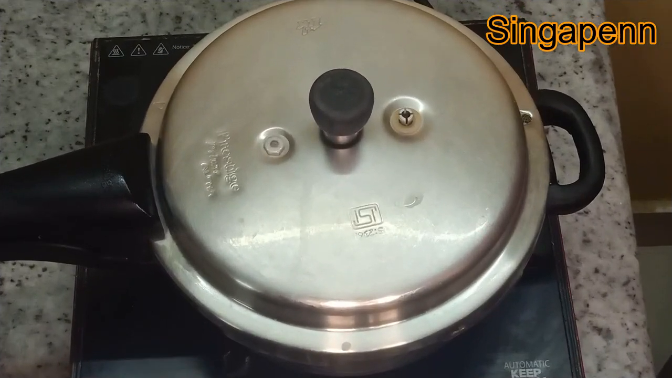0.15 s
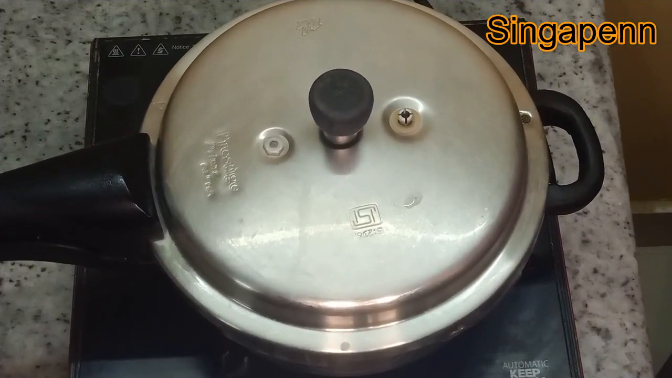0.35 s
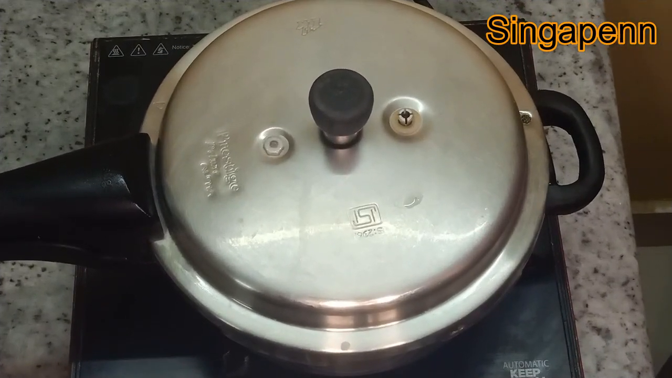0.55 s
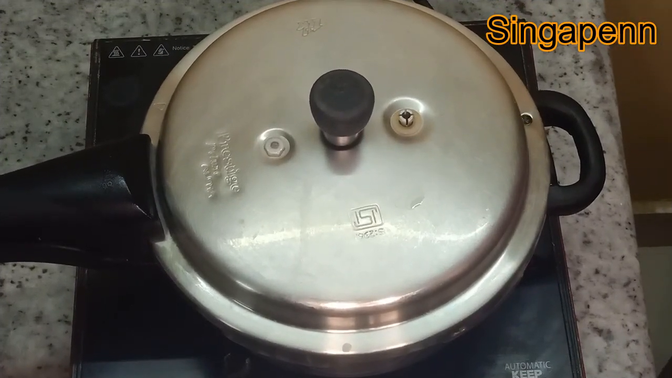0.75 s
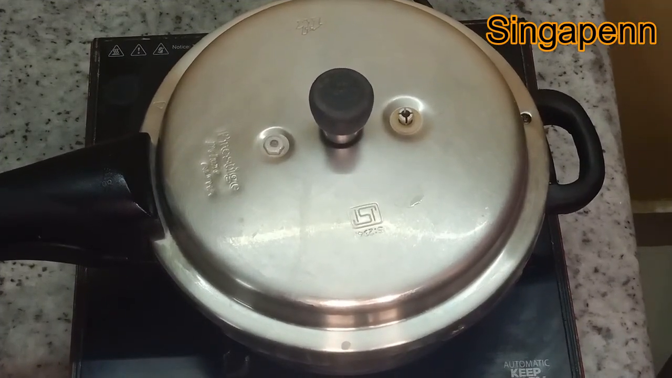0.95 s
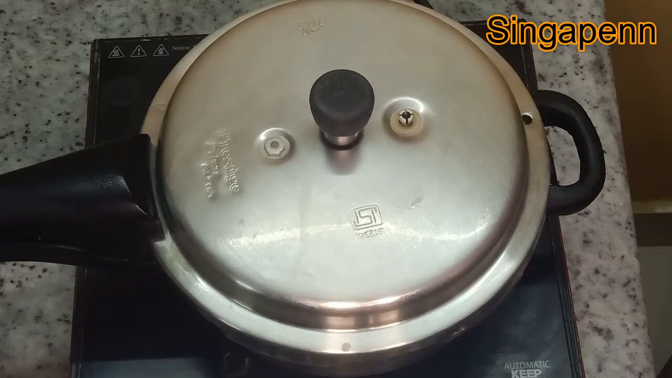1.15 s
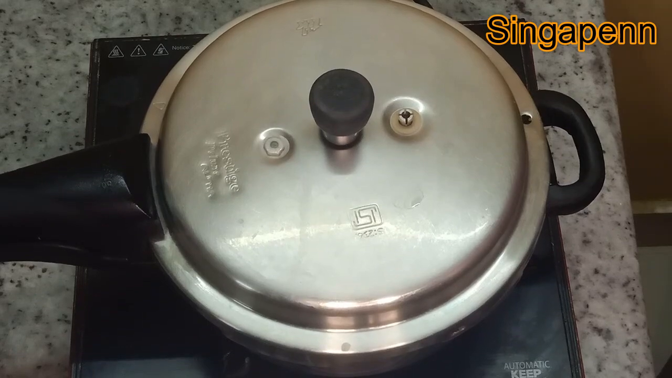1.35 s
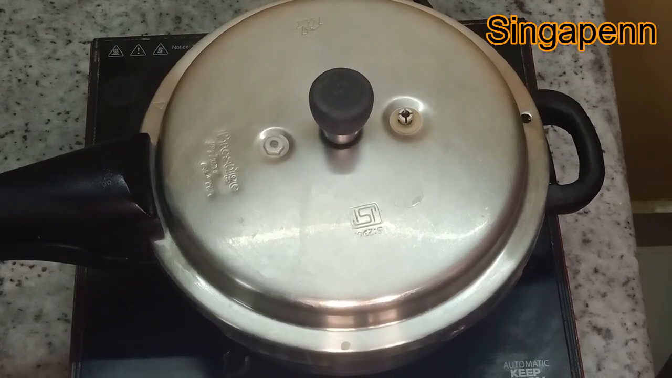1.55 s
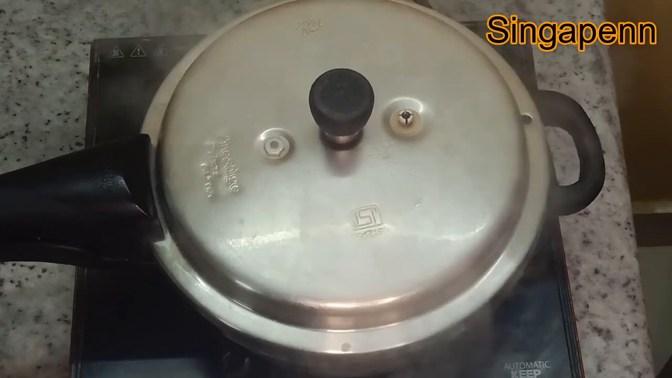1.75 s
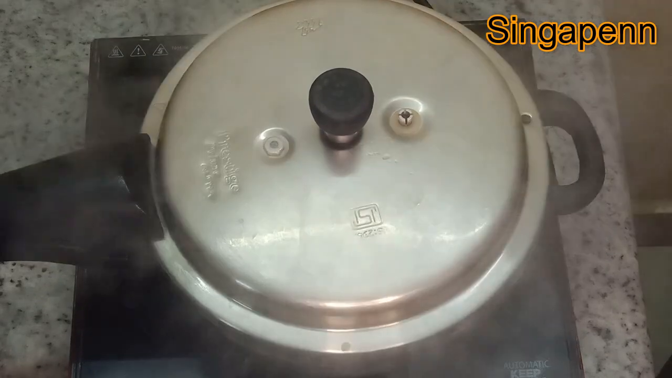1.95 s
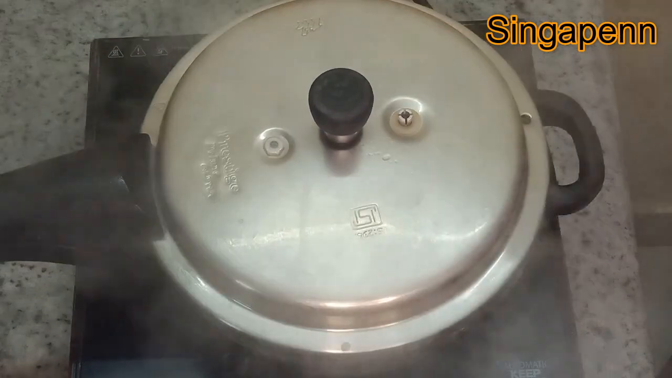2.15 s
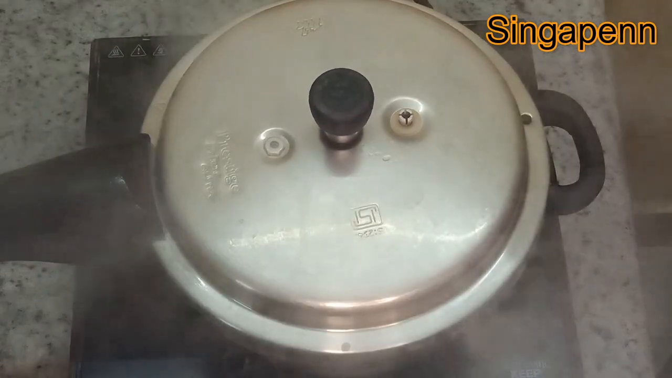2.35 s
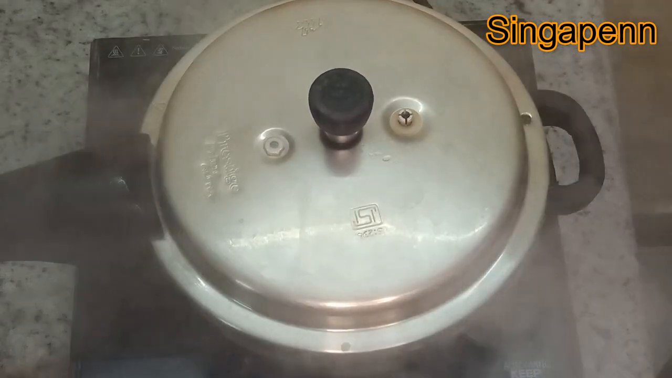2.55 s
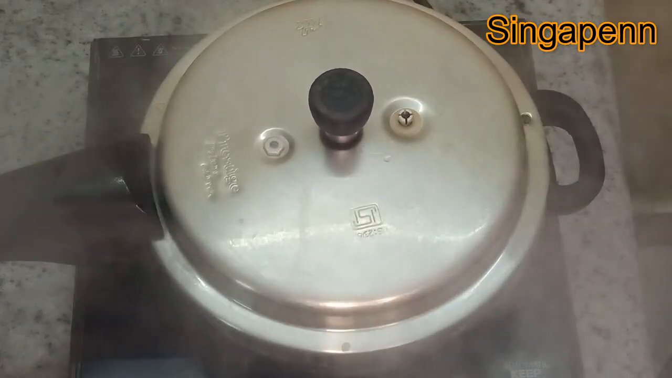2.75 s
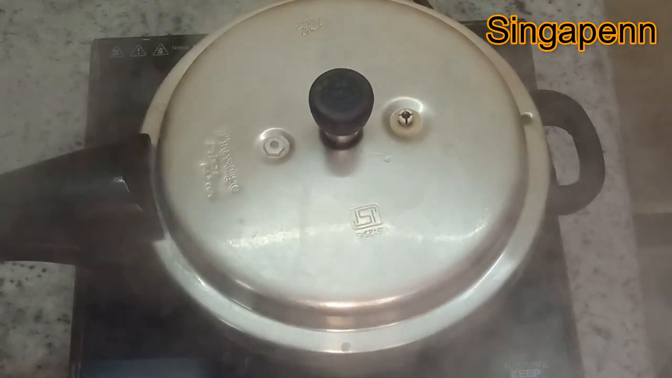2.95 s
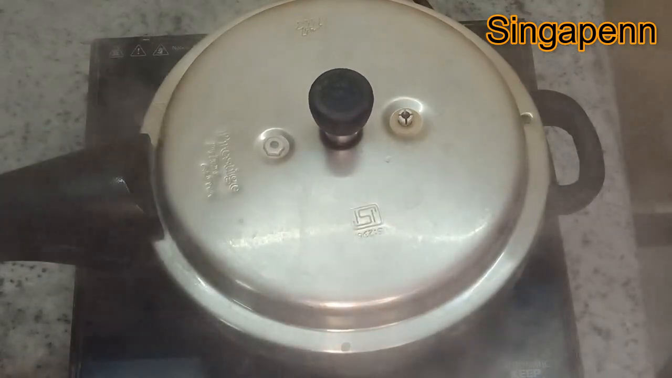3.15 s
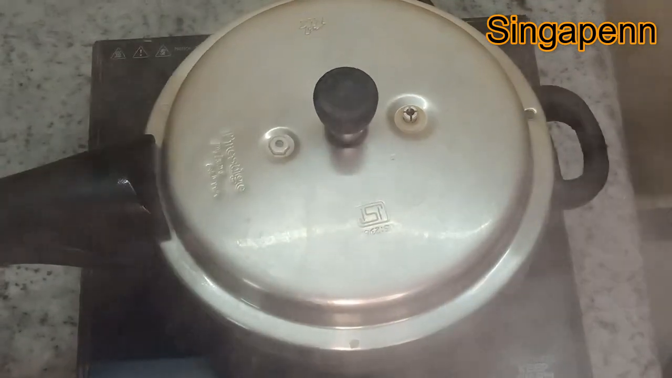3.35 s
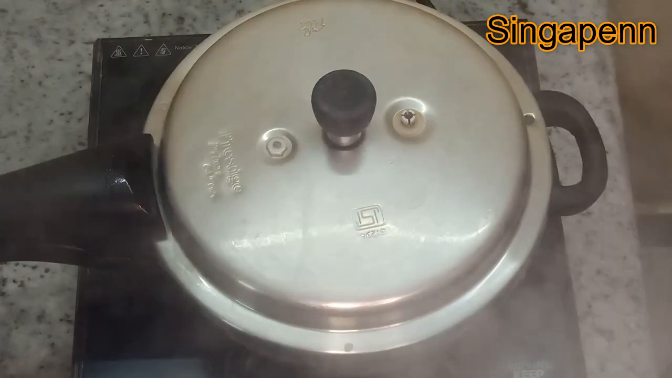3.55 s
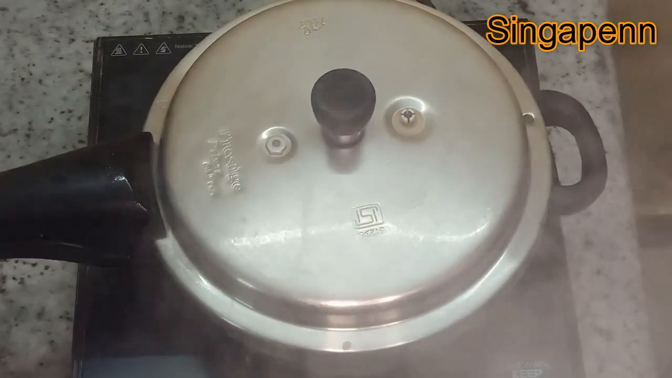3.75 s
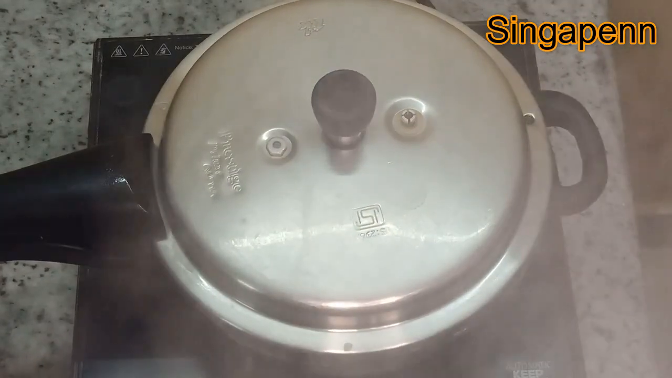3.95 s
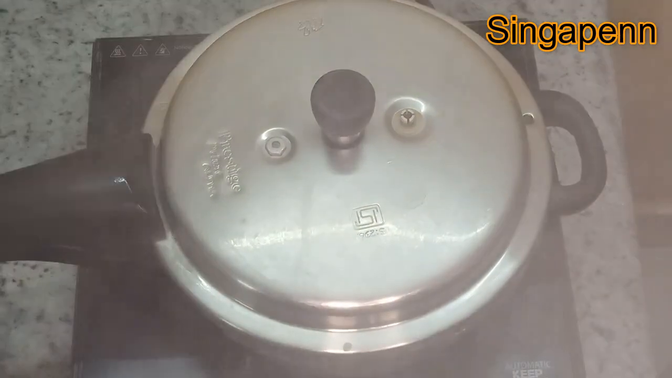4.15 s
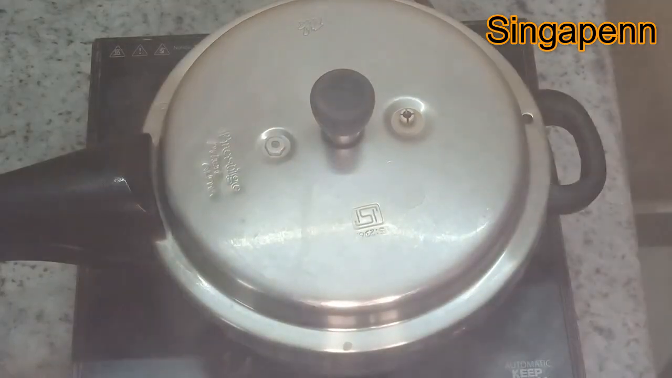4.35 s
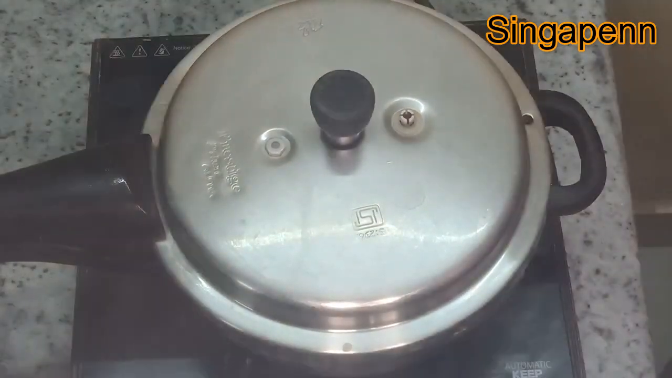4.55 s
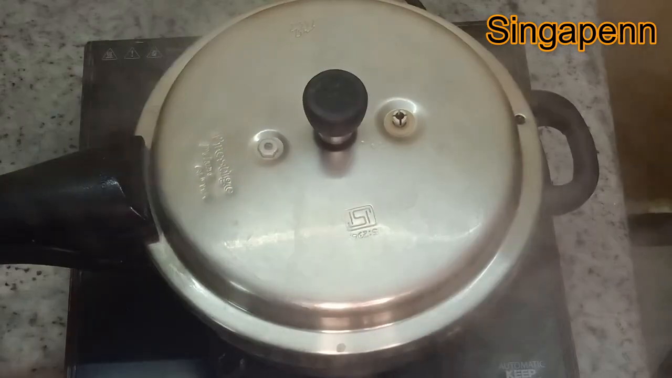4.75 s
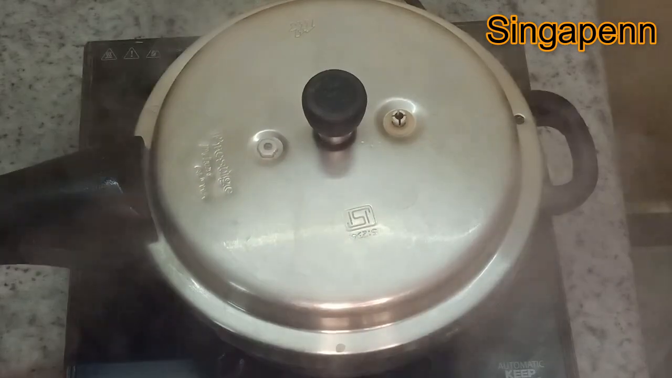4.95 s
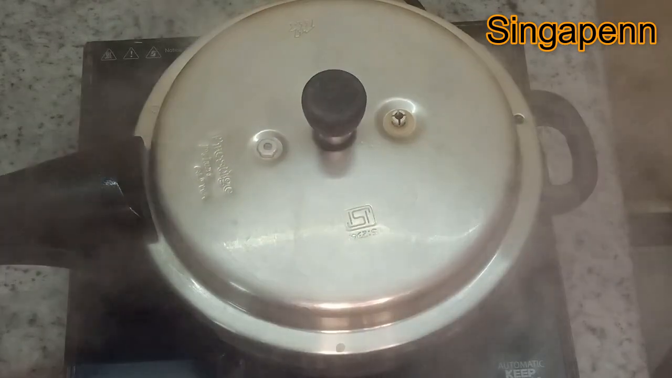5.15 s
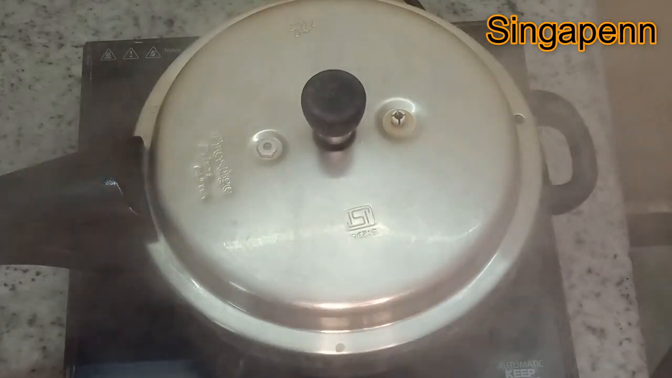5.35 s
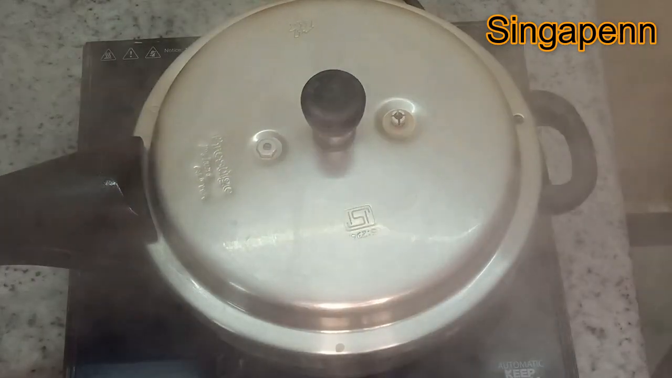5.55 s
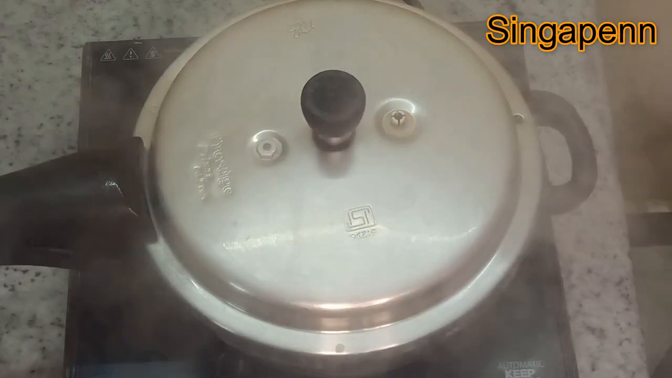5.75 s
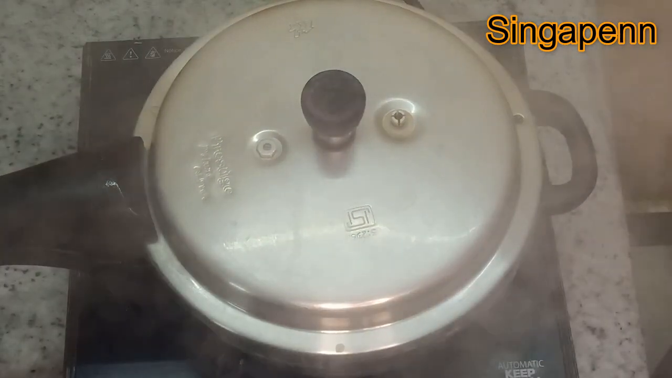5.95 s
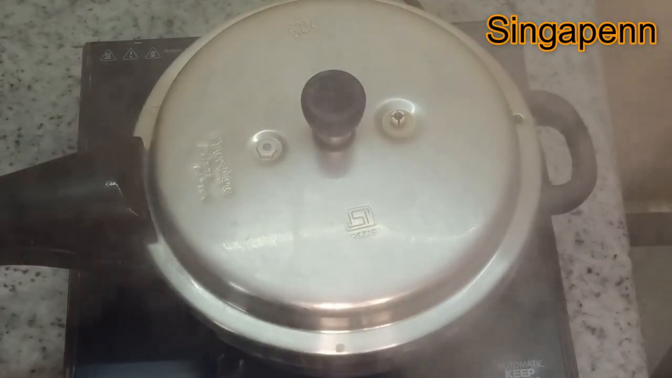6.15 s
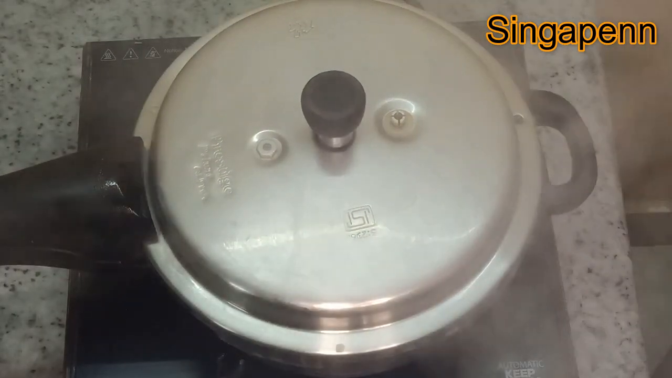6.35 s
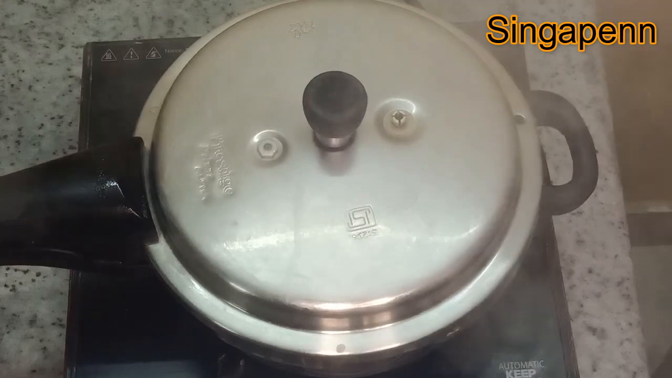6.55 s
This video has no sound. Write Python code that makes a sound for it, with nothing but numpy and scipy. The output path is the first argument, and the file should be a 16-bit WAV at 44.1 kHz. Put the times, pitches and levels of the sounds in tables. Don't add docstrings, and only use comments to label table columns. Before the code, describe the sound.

A hob fan hums steadily beneath a pressure cooker whose pot rumbles as it boils. Steam spits past the weight, building to a fierce, breathy hiss with low buffeting gusts, strongest at the start. It shuts off abruptly and the weight clacks and bounces on metal. After a quieter second, another blast starts instantly, then drops off with a longer clatter. Very close microphone, small kitchen, two tiny dropouts.

```python
import sys
import numpy as np
from scipy import signal
from scipy.fft import rfft, irfft, next_fast_len
from scipy.io import wavfile
from scipy.ndimage import uniform_filter1d

SR = 44100
rng = np.random.default_rng(int(sys.argv[2]) if len(sys.argv) > 2 else 0)


def generate_wav(sig):
    pcm = np.round(np.clip(np.atleast_2d(sig).T, -1, 1) * 32767).astype(np.int16)
    wavfile.write(sys.argv[1], SR, pcm)


def gain_from_db(level_db):
    decades = np.asarray(level_db, float) / 20
    return 10 ** decades


N = 291623
T = np.arange(N) / SR
FRAMES, HZ = N // 128 + 5, np.fft.rfftfreq(512, 1 / SR)
JOIN_S = 0.151
JOINED = np.clip((T - JOIN_S) * 300, 0, 1)
POP_SHARE = 0.12


def evened(x):
    return x / np.sqrt(np.mean(x ** 2) + 1e-20)


def read(points, hz, log=True):
    f, value = np.transpose(points)
    if log:
        return np.interp(np.log(hz + 1), np.log(f + 1), value)
    return np.interp(hz, f, value)


def colour(x, points, bumps=()):
    size = next_fast_len(N)
    hz = np.fft.rfftfreq(size, 1 / SR)
    db = read(points, hz)
    db = db + sum(d * np.exp(-.5 * ((hz - f) / w) ** 2) for f, w, d in bumps)
    return evened(irfft(rfft(x, size) * gain_from_db(db), size)[..., :N])


def turbulence(same, patchy_db, flicker_db, tilt_db=0.):
    a, b, c, d, patches = rng.standard_normal((FRAMES, len(HZ), 5)).T
    patches = uniform_filter1d(patches, size=8, axis=0)
    patches = evened(uniform_filter1d(patches, size=24, axis=1))
    gusts = uniform_filter1d(rng.standard_normal(FRAMES), size=7)
    gusts = evened(uniform_filter1d(gusts, size=5))
    same = np.clip(same, 0, 1)[:, None]
    left = a + 1j * b
    right = same * left + np.sqrt(1 - same ** 2) * (c + 1j * d)
    z = np.array([left, right]) * gain_from_db(patchy_db * patches + flicker_db * gusts + tilt_db)
    return signal.istft(z, nperseg=512, noverlap=384)[1][:, :N]


def humps(rows):
    return np.sqrt(sum(gain_from_db(2 * db - 20 * ((T - s) / half) ** 2) for s, db, half in rows))


# f/Hz, level/dB per Hz
EARLIER_AIR = [(35, -112), (60, -82), (136, -11), (244, -0.5), (371, -14), (394, -12), (844, -14),
               (1160, -17), (1670, -11.5), (2040, -15), (3500, -23.5), (7200, -49), (9360, -92),
               (15800, -120)]
# f/Hz, left-right likeness
AIR_SAME = [(60, 0.95), (300, 1), (700, 0.43), (1400, 0.11), (3000, 0.2), (8000, 0.1)]


def earlier_kitchen():
    room = turbulence(read(AIR_SAME, HZ), patchy_db=1, flicker_db=.3)
    room = colour(room, EARLIER_AIR, [(6300, 700, 8)])
    return (1 - JOINED) * room * gain_from_db(-53.5)


def ducked():
    duck_db, duck_s, hold_s, recover_db_per_s = -8.5, 0.7, 0.14, 4
    db = np.zeros(N)
    for opened, shut, *_ in BLASTS:
        sunk = db + (duck_db - db) * np.clip((T - opened) / duck_s, 0, 1)
        recovery = recover_db_per_s * np.maximum(T - shut - hold_s, 0)
        db = np.minimum(sunk + recovery, 0)
    return db


# f/Hz, level/dB per Hz
FAN_AIR = [(15, -76), (25, -59), (86, -17.5), (215, -21), (281, -8), (445, -15.5), (482, -15.5),
           (741, -15.5), (1080, -5.5), (1410, -15), (1950, -9.5), (4150, -23.5), (6550, -28.5),
           (8350, -35.5), (15500, -62.5)]
# f/Hz, width/Hz, level/dB
HOUSING_MODES = [(320, 89, -3), (368, 13.3, 6), (1056, 13, 6.5), (1040, 110, -2.5), (1290, 190, 6),
                 (4670, 590, -4), (6250, 190, 9), (7300, 290, 9.5), (9250, 560, -11), (15400, 80, 9)]
# multiple of blade rate, level/dB re fan
BLADE_TONES = [(1, -19.5), (4, -12.5), (7, -36)]


def fan():
    blades_hz, fan_db = 280.8, -49
    air = turbulence(read(AIR_SAME, HZ), patchy_db=1.2, flicker_db=.5)
    air = colour(air, FAN_AIR, HOUSING_MODES)
    speed, loudness = evened(uniform_filter1d(rng.standard_normal((2, N)), size=3000))
    turn = 2 * np.pi * np.cumsum(blades_hz * (1 + 0.0029 * speed)) / SR
    tone = sum(gain_from_db(db + 0.83 * loudness) * np.sqrt(2) * np.sin(k * turn) for k, db in BLADE_TONES)
    return JOINED * (air + tone) * gain_from_db(fan_db + ducked())


# f/Hz, level/dB per Hz
BOIL_RUMBLE = [(24, -55), (40, -30.5), (92, -13), (129, -16.5), (214, -10), (285, -1.5), (375, -5),
               (461, -18), (550, -9.5), (720, -19), (1210, -120)]
# t/s, peak level/dB, half length/s
BOIL_SURGES = [
    (.27, -53, .08),
    (.43, -51, .09),
    (.72, -61, .1),
    (.95, -57.5, .15),
    (1.2, -57, 0.27),
    (1.37, -56, 0.043),
    (1.62, -57, 0.059),
]


def boil():
    rumble = colour(turbulence(.85 + 0 * HZ, patchy_db=1.8, flicker_db=.7), BOIL_RUMBLE)
    return rumble * humps(BOIL_SURGES) * (T > JOIN_S)


# f/Hz, level/dB per Hz
LEAK_HISS = [(940, -32), (1600, -15), (2540, -6), (4360, -10), (6010, 2), (7970, -13), (9100, -20.5),
             (11900, -21), (12800, -35), (15300, -19.5)]
# f/Hz, left-right likeness
STEAM_SAME = [(500, 0.96), (1500, 0.41), (4000, 0.65), (7000, 0.45), (10000, 0.35), (14000, 0.25)]
# f/Hz, width/Hz, first blast level/dB, second blast level/dB
CAVITIES = np.array([(1690, 98, 2, 1.5), (2357, 82, 4, 4), (2802, 116, 5, 6), (3590, 270, 3.5, 3),
                     (4180, 32, 3.5, -4), (4570, 110, 6, 5), (5040, 88, 2, 5.5), (5480, 710, -3, -5),
                     (7830, 94, 3.5, 4), (9500, 130, -1.5, -2), (10500, 150, -0.5, -1),
                     (10820, 260, -1.5, -1.5), (13300, 410, -9, -8)])
# t/s, peak level/dB, half length/s
STEAM_PUFFS = [
    (.67, -55, .02),
    (.761, -46.5, 0.038),
    (1.305, -53, .03),
    (1.417, -49, 0.042),
    (1.511, -47.5, 0.036),
    (1.6, -50.5, 0.04),
    (3.9, -73, .035),
]


def leak():
    seep_db, leak_s, leak_db = -72, 0.645, -55.5
    hiss = turbulence(read(STEAM_SAME, HZ), patchy_db=2.0, flicker_db=0.8)
    hiss = colour(hiss, LEAK_HISS, CAVITIES[:, :3])
    steady = gain_from_db(np.where(T < leak_s, seep_db, leak_db))
    steady = steady * (T > JOIN_S) * (T < BLASTS[0][0])
    return hiss * gain_from_db(5.0) * np.hypot(steady, humps(STEAM_PUFFS))


# t/s, change/dB, half length/s
WEIGHT_WOBBLES = [
    (1.73, -2.5, 0.0074),
    (3.414, -1.5, 0.023),
    (4.656, 1.5, 0.07),
    (4.745, -2.5, 0.016),
    (6.33, -0.5, .1),
]


def flow(row, t):
    opened, shut, steady_db, surge_db, lift_s = row
    lift_db, pop_db = 24, 6.5
    settle_db_per_s, creep_db_per_s = 12.5, 0.65
    shut_db_per_s, tail_db, tail_db_per_s = 157, -6.5, 95
    surge = np.clip(surge_db - settle_db_per_s * (t - opened), 0, surge_db)
    creep = creep_db_per_s * np.clip(t - opened - surge_db / settle_db_per_s, 0, 1)
    after = np.maximum(t - shut, 0)
    dying = np.maximum(-shut_db_per_s * after, tail_db - tail_db_per_s * after)
    early = np.maximum(opened - t, 0) / lift_s
    lifting = -pop_db * np.minimum(early / POP_SHARE, 1) - lift_db * early
    wobble = sum(db * np.exp(-((t - s) / half) ** 2) for s, db, half in WEIGHT_WOBBLES)
    level = np.maximum(steady_db + surge + creep + dying + lifting + wobble, -200)
    return level, surge, dying


# f/Hz, level/dB per Hz
FIRST_JET = [(290, -67), (500, -47), (952, -21.5), (1320, -12), (2150, -11), (2830, -5), (4280, -8.5),
             (5950, -1), (6670, -11), (8030, -16.5), (11200, -24.5), (12300, -21), (15300, -24.5)]
# f/Hz, level/dB per Hz
SECOND_JET = [(290, -52), (500, -38.5), (925, -22.5), (1340, -11), (1980, -14), (2830, -7), (3400, -2.5),
              (4220, -9), (5950, 1), (6670, -10), (7920, -13.5), (9140, -20), (15300, -24)]
# opening t/s, shutting t/s, steady level/dB, first surge/dB, lift time/s
BLASTS = [
    (1.706, 3.485, -29.5, 9, 0.13),
    (4.636, 6.422, -30, 7.5, 0.0016),
]


def blast(row, air, cavity, pan_db):
    _, surge_db, dying_db = flow(row, np.arange(FRAMES) * 128 / SR)
    shutting = np.clip(-dying_db / 12, 0, 1)
    fading = np.clip(-dying_db / 35, 0, 1) ** 2
    low = np.clip((2000 - HZ) / 1200, 0, 1)[:, None]
    top = np.clip((HZ - 6500) / 2500, 0, 1)[:, None]
    gap = np.exp(-.5 * ((HZ[:, None] - 4700) / 650) ** 2)
    low_db = -3 + 0.13 * surge_db + 8 * shutting
    top_db = -1.3 + 3 * shutting - 11 * fading
    tilt_db = low * low_db + top * top_db + gap * 0.092 * surge_db
    hiss = turbulence(read(STEAM_SAME, HZ), patchy_db=0.18, flicker_db=0.74, tilt_db=tilt_db)
    hiss = colour(hiss, air, cavity)
    return hiss * gain_from_db(flow(row, T)[0] + pan_db * np.array([[.5], [-.5]]))


# f/Hz, level/dB per Hz
GUST_RUMBLE = [(15, -49.5), (25, -17), (43, -12.5), (113, -2), (223, -3.5), (287, -1), (364, -3),
               (700, 0.5), (910, 1), (1540, -120)]


def buffet():
    gust_db, db_per_surge_db, lag_s, fall_db_per_s = -62.5, 2, 0.11, 150
    gust = colour(turbulence(0.15 + 0 * HZ, patchy_db=2.2, flicker_db=2.2), GUST_RUMBLE)
    strength = np.zeros(N)
    for row in BLASTS:
        opened, shut, _, _, lift_s = row
        onset = np.clip(1 + (T - opened) / (POP_SHARE * lift_s), 0, 1)
        fall_db = fall_db_per_s * np.maximum(T - shut - lag_s, 0)
        strength += onset * gain_from_db(gust_db + db_per_surge_db * flow(row, T)[1] - fall_db)
    return gust * strength * gain_from_db(np.array([[-2.5], [3.]]))


# t/s, peak level/dB, brightness/dB per octave
WEIGHT_STRIKES = [(3.547, -28, 3), (3.559, -40, 1), (3.572, -41, -2), (3.579, -30.5, 0), (3.591, -41, 1),
                  (3.601, -44, -4), (3.612, -44, -6), (3.624, -45, -6), (6.446, -30, 8), (6.479, -28, 2),
                  (6.492, -40, 3), (6.503, -42, -2), (6.513, -37, 4), (6.531, -39, 3), (6.538, -41, -2),
                  (6.547, -42, -2), (6.558, -42, -1), (6.584, -48, -3)]
# f/Hz, level/dB, t60/s
LID_MODES = [(540, -4, .03), (670, 0, .03), (800, 0, .035), (1020, -3, .035), (1330, -4, .03),
             (1620, -3, .035), (2600, -9, .03), (570, -14, .3), (640, -12, .3), (760, -15, .2)]


def weight():
    t, out = np.arange(9000) / SR, np.zeros(N + 9000)
    spots = rng.standard_normal((len(WEIGHT_STRIKES), len(LID_MODES), 2))
    contact = np.sin(np.pi / 2 * np.minimum(t / .0008, 1)) ** 2
    for (s, db, bright_db), spot in zip(WEIGHT_STRIKES, spots):
        ring = np.zeros(len(t))
        for (f, mode_db, t60), (level, detune) in zip(LID_MODES, spot):
            decay = gain_from_db(mode_db + 1.8 * level + bright_db * np.log2(f / 700) - 60 * t / t60)
            ring += decay * np.sin(2 * np.pi * f * (1 + 0.015 * detune) * t)
        ring *= contact
        out[round(s * SR):][:len(t)] += gain_from_db(db) * ring / abs(ring).max()
    highpass = signal.butter(4, 470, "high", fs=SR, output="sos")
    return signal.sosfilt(highpass, out)[None, :N]


# f/Hz, left lead/rad
PORT_LEAD = [(0, 0), (2580, 0.7), (3880, 2.6), (4390, -4.5), (5430, -3.9), (6290, -9.5), (7060, -9.3),
             (7840, -13.2), (9390, -15.5), (10200, -12.8), (10500, -9.3), (12700, -10.1), (13100, -9.5),
             (15800, -9.0)]
# f/Hz, left minus right level/dB
PORT_BALANCE = [(60, -4.5), (110, -6.5), (200, -6.0), (380, -3.5), (700, -3.0), (1290, -1.5), (2380, -0.5),
                (4400, 0.0), (8120, 0.5), (15000, -2.0)]


def nearby(x, echo_db, t60):
    delay = 256
    t = np.arange(6000) / SR
    taps = rng.choice([-1., 1.], (2, len(t))) * (rng.random((2, len(t))) < .06)
    taps = taps * gain_from_db(-60 * t / t60) * (t > 30 / SR)
    echoes = gain_from_db(echo_db) * rfft(taps / np.linalg.norm(taps[0]), 8192)
    hz = np.fft.rfftfreq(8192, 1 / SR)
    half = gain_from_db(read(PORT_BALANCE, hz) / 2) * np.exp(.5j * read(PORT_LEAD, hz, log=False))
    late = np.exp(-2j * np.pi * hz * delay / SR)
    path = np.array([half, 1 / half]) * late * (1 + echoes)
    wet = signal.fftconvolve(x, irfft(path), axes=1)[:, delay:N + delay]
    return wet / np.sqrt(1 + gain_from_db(2 * echo_db))


def scene():
    background = earlier_kitchen() + fan() + boil()
    first = leak() + blast(BLASTS[0], FIRST_JET, CAVITIES[:, [0, 1, 2]], pan_db=0.1)
    second = blast(BLASTS[1], SECOND_JET, CAVITIES[:, [0, 1, 3]], pan_db=-.9)
    steam = nearby(first, echo_db=-9, t60=.15) + nearby(second, echo_db=-9, t60=.15)
    knocks = nearby(weight(), echo_db=-10, t60=.2)
    return background + steam + buffet() + knocks


def top_cut(x):
    return signal.sosfilt(signal.butter(12, 16170, fs=SR, output="sos"), x)


# frozen t/s, released to zero t/s, resumed t/s, frozen left value, frozen right value
DROPOUT_TIMES = [
    (.5652, .5878, .5918, 0., -.0017),
    (4.5655, 4.5886, 4.6014, -.0005, .0006),
]


def record(dry):
    out = dry
    for frozen, released, resumed, left, right in DROPOUT_TIMES:
        held = np.array([[left], [right]]) * (T < released)
        out = np.where((T > frozen) & (T < resumed), held, out)
    lowpass = signal.firwin(801, 15500, window=("kaiser", 9), fs=SR)
    out = signal.oaconvolve(out, lowpass[None], "same")
    return top_cut(out)


dry = scene()
out = record(dry)
generate_wav(out)
```